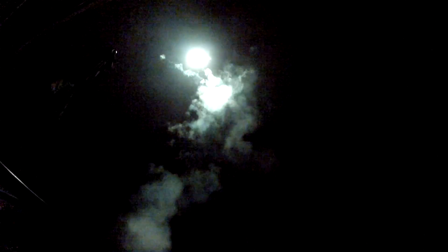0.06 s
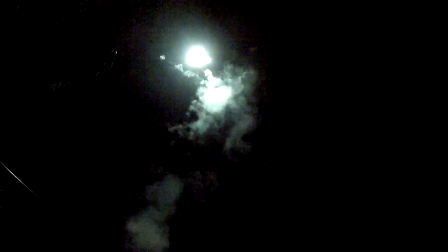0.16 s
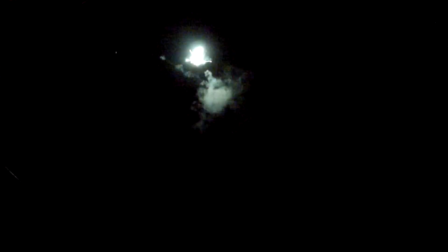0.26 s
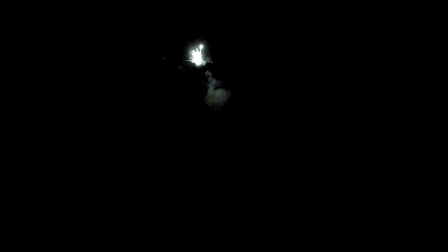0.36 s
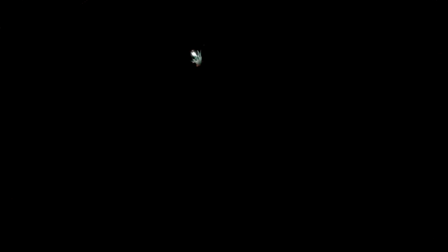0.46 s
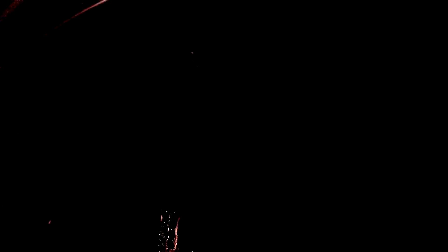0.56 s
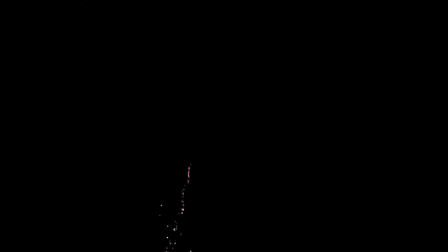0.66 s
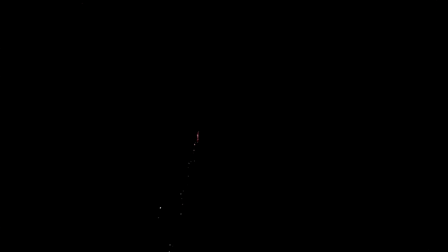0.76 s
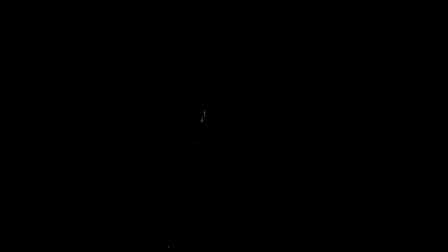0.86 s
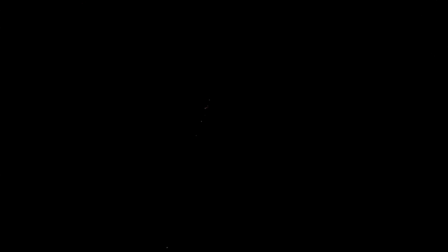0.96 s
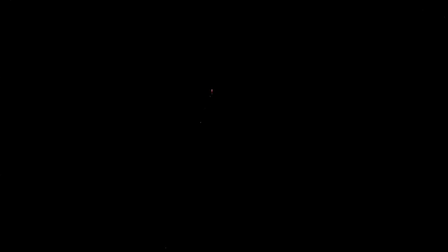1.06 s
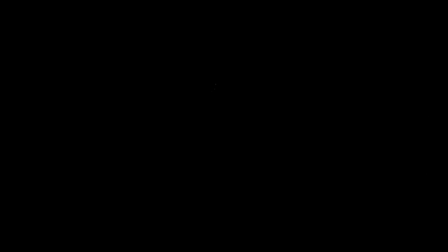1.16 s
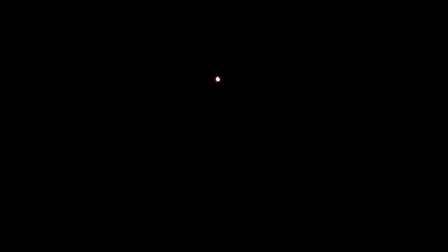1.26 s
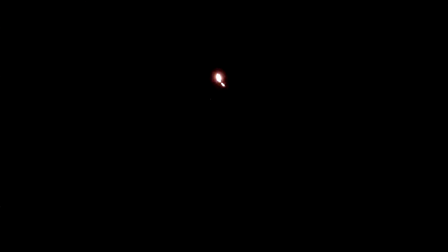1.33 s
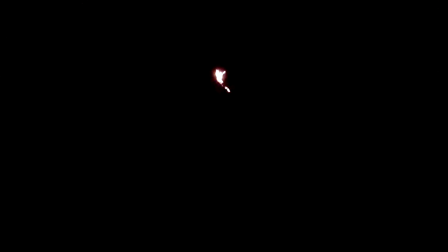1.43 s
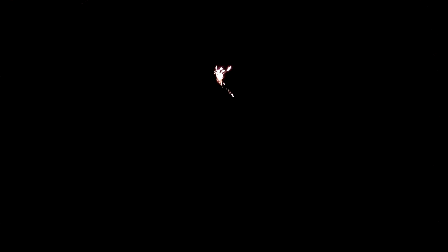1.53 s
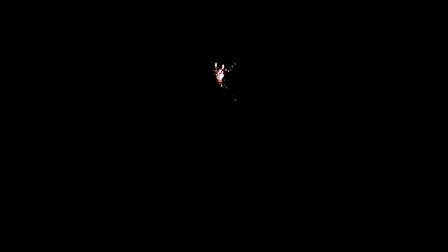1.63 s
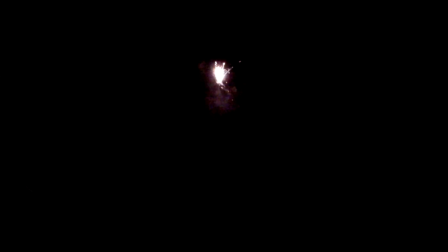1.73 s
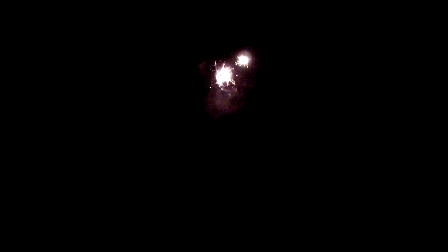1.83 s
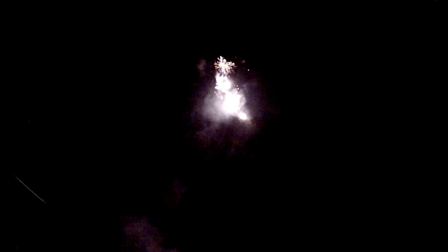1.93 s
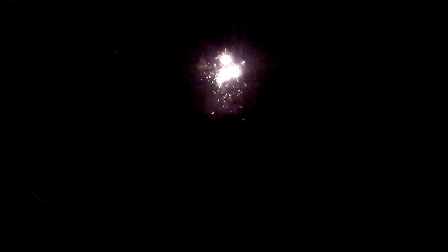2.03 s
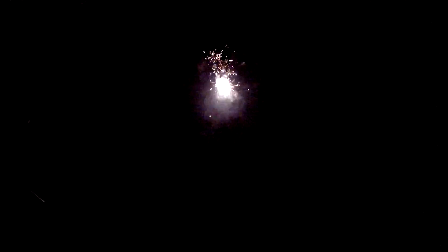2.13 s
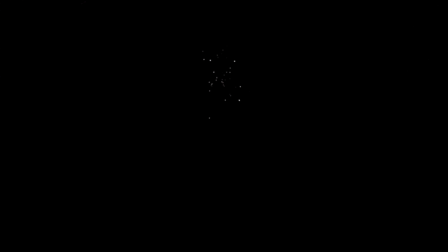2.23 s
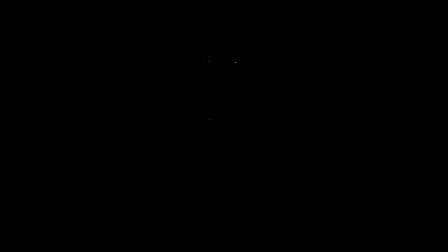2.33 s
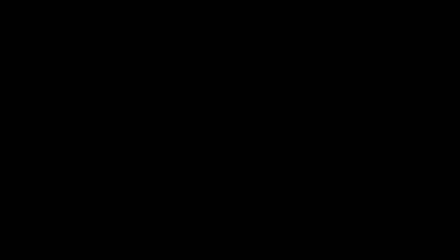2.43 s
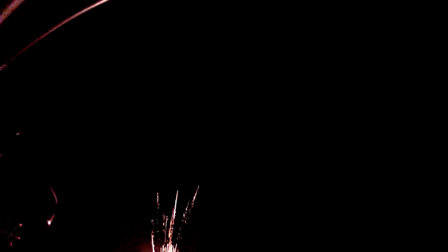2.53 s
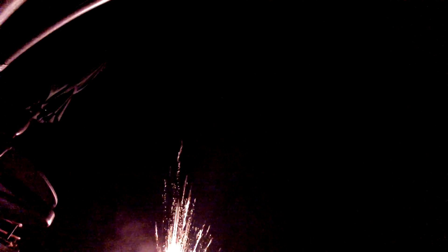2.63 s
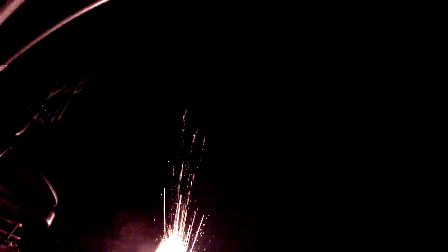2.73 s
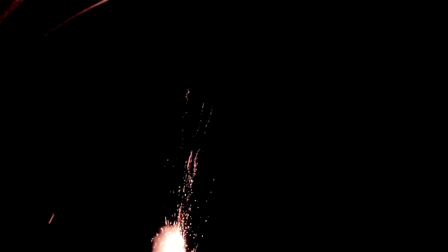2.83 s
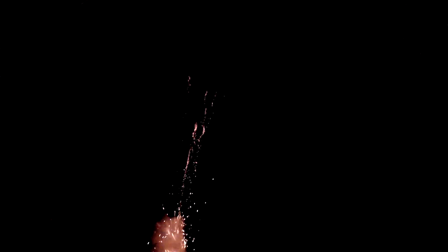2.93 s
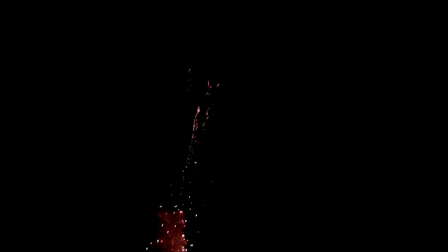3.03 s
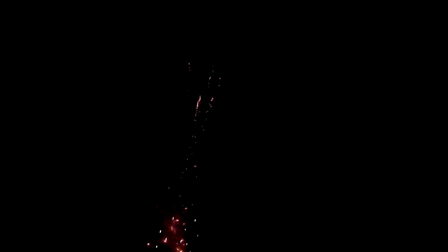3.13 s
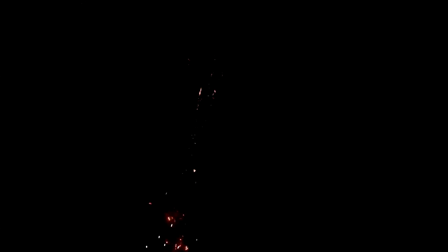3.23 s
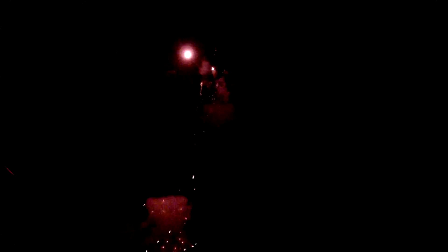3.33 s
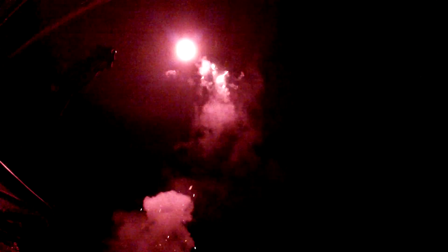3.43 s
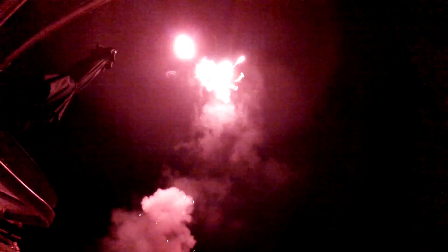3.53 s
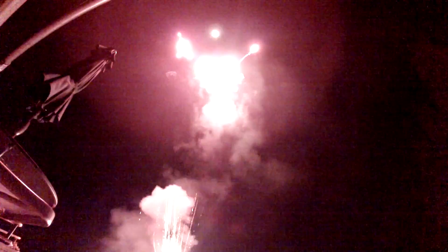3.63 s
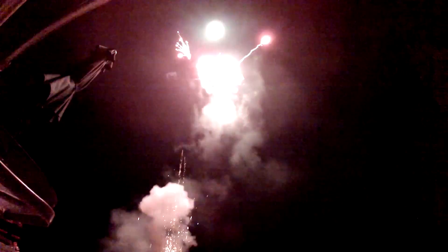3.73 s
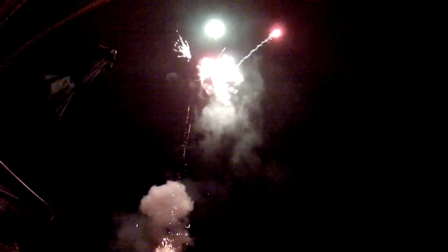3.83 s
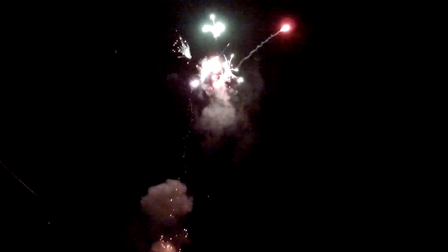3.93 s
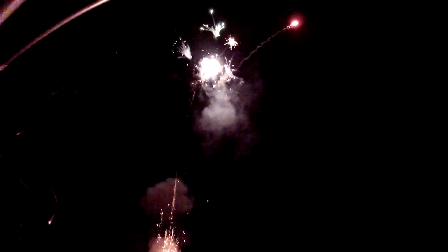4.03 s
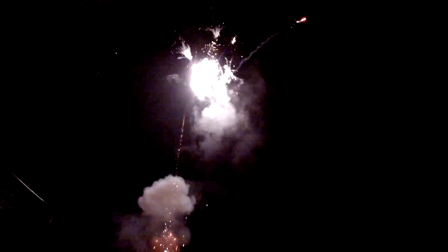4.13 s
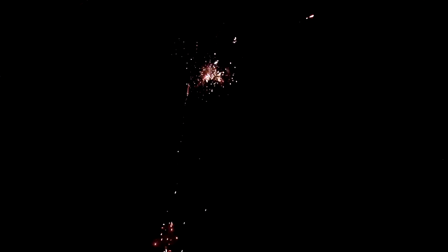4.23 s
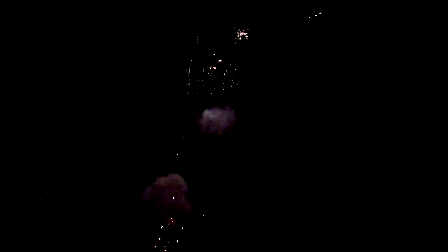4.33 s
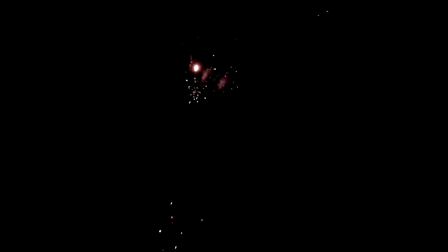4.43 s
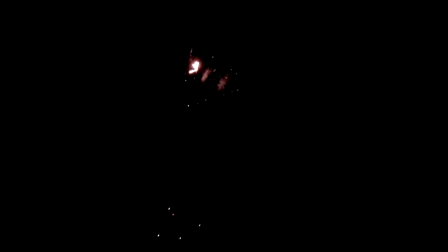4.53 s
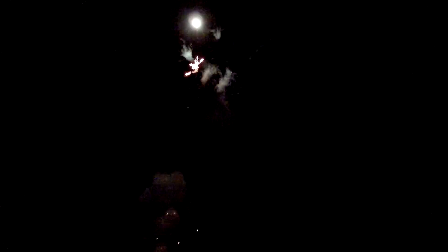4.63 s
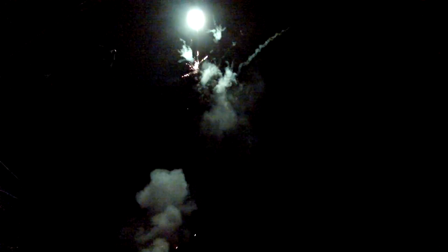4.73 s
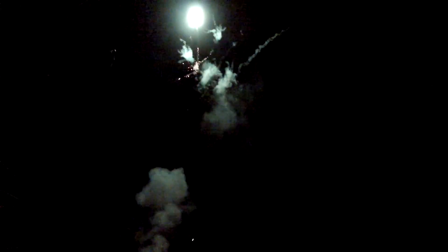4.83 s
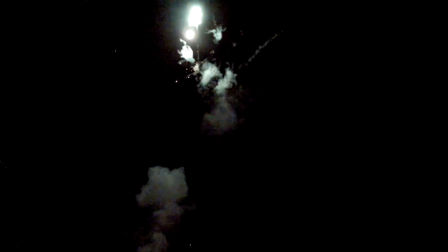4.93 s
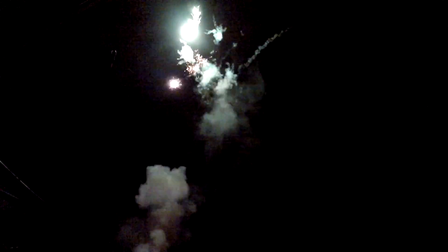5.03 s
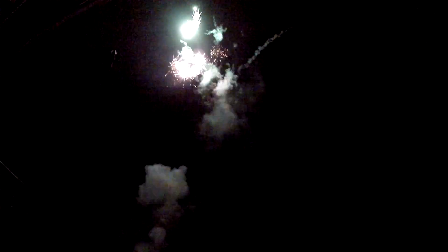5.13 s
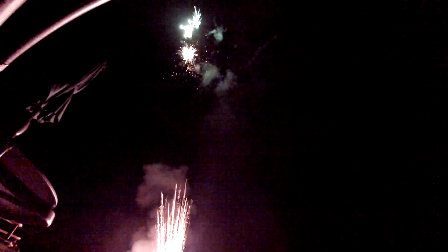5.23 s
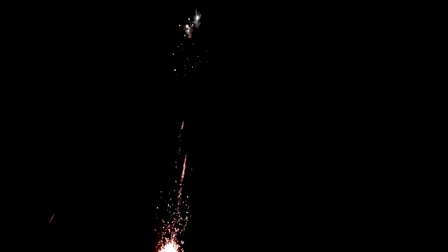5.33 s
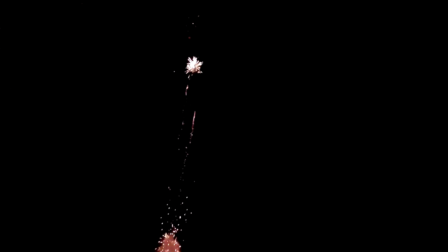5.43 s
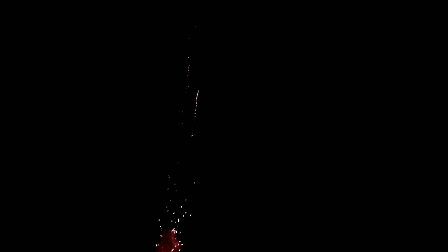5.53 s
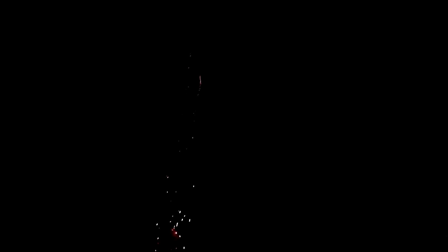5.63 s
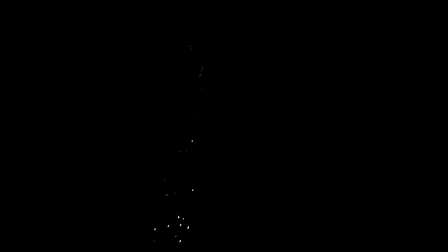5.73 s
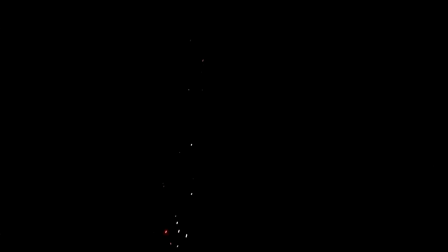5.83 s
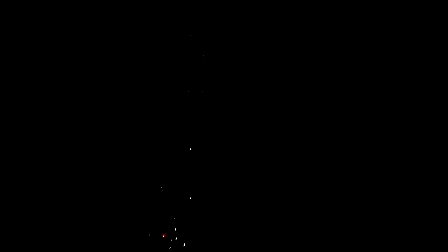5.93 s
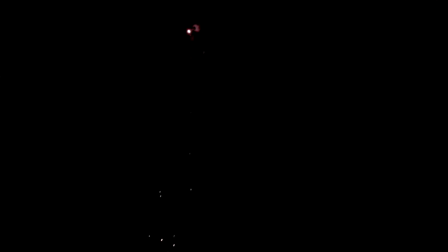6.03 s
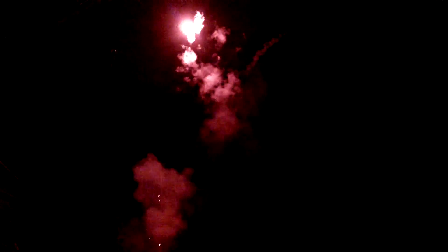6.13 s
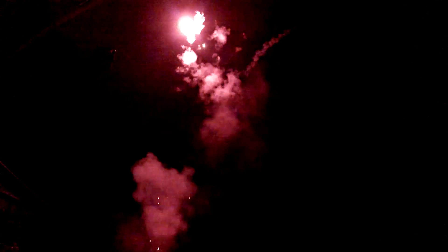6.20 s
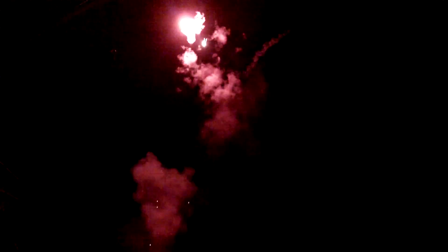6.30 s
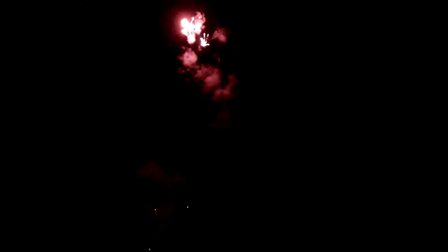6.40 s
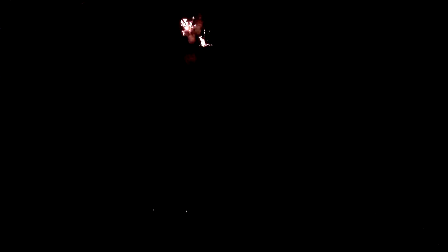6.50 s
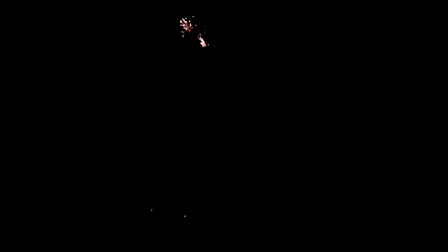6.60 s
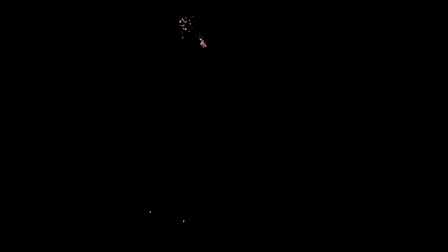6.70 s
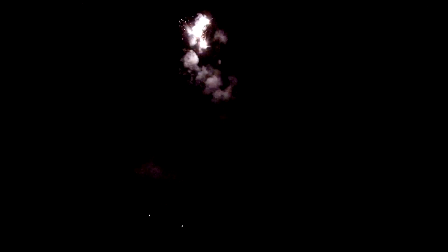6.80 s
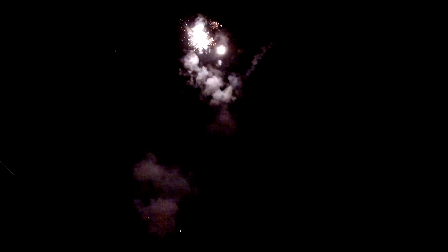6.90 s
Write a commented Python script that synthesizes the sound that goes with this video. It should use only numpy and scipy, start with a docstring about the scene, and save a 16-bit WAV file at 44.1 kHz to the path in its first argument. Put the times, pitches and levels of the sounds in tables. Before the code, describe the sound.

At night outdoors, heavy distorted launch thuds alternate with rapid, loud crackles from above, echoing off trees and walls over low rumble.

```python
"""Open ground at night, close to a firework cake that is firing.
Lift charges thump, each a weak noisy arrival and then a strong blast, and overload the microphone. Overhead, crackling
stars burst in volleys of sharp pulses, each followed by its reflection off the ground. Tails and flares hiss as noise.
Trees and walls answer with a long echo. A low rumble, dull thuds, soft pops and faint hollow sounds fill in."""
import sys
import numpy as np
from scipy import signal
from scipy.fft import rfft, irfft, next_fast_len
from scipy.io import wavfile

SR = 44100
rng = np.random.default_rng(int(sys.argv[2]) if len(sys.argv) > 2 else 0)


def int16_out(signal):
    """Quantize to a 16-bit WAV file."""
    q = np.round(np.clip(np.atleast_2d(signal).T, -1, 1) * 32767)
    wavfile.write(sys.argv[1], SR, q.astype(np.int16))


N = 306936   # length of the scene [samples]

# The cracks that stand out, stars bursting overhead: (time [s], peak of the direct shock [dB])
SINGLE_CRACKS = [(0.6673, -37.5), (1.353, -37.5), (1.8326, -6.5), (1.844, -3), (1.8873, -2), (1.9196, -4),
                 (1.9222, -3), (1.9391, -5.5), (2.0065, 0), (2.0308, -3), (2.0434, 2), (2.0533, 0.5),
                 (2.0788, -2), (2.1152, 1), (2.1179, -0.5), (2.1248, -2.5), (2.162, -1), (2.1843, -3.5),
                 (2.1874, 0.5), (2.2116, -.5), (2.2318, 1), (3.4995, -35), (3.558, -28), (3.599, -28.5),
                 (3.8029, -33), (3.9732, -8), (4.011, -7), (4.0335, -2), (4.0634, -7), (4.094, -9.5),
                 (4.1222, -9.5), (4.1477, -4), (4.1618, 0.5), (4.2033, -1), (4.2084, 0.5), (4.2148, 0.5),
                 (4.2475, 0), (4.2631, -0.5), (4.2751, -1), (4.3059, -5.5), (4.3165, -3.5), (4.4183, -5.5),
                 (4.4676, -4.5), (4.8915, -6), (4.977, -26), (5.1046, -3), (5.1089, -2.5), (5.1179, -2),
                 (5.1396, -5.5), (5.1695, -0.5), (5.1993, -0.5), (5.2138, -3.5), (5.2232, 1),
                 (5.2401, -1.5), (5.3194, -5), (5.378, 2), (5.512, 0), (6.1511, -35.5), (6.3496, -26),
                 (6.51, -29), (6.8927, -8), (6.9146, -8), (6.928, -5.5)]
# Weaker stars in the thick of a volley, too fast to tell apart:
# (start [s], length [s], rate [stars per s], typical peak [dB])
STAR_VOLLEYS = [(4.068, .115, 61, -9), (4.209, .055, 145, -5), (5.215, .02, 150, -3.5),
                (5.266, .036, 83, -6), (6.917, .045, 67, -8)]
# Lift charges: (time [s], blast peak [dB], extra bass [dB], extra treble [dB])
LIFT_CHARGES = [(0.5699, -5.5, -9.5, -5.5), (0.5743, 0.5, -10, 2), (2.564, 6, -0.5, 2),
                (2.6241, 5.5, -1.5, 0.5), (2.646, 4.5, 6.5, -6.5), (2.686, -9, -16.5, 4),
                (2.692, 0, -3, -1), (2.7411, 3, 0.5, -5), (2.8037, 7.5, 0.5, 5.5), (2.8363, 3, -3, -1.5),
                (3.643, -13, -20, 8), (3.6469, 2, -6.5, -1), (3.705, 7, 3.5, 2), (4.0426, 6.5, -1.5, 5.5),
                (5.258, 8.5, 4.5, -2), (5.2921, 2, 3, -3)]
# Dull knocks and thuds from further off: (time [s], level before a 6.5 dB cut [dB], pitch [Hz])
DULL_THUDS = [(0.699, -32, 91.5), (0.777, -38, 108), (1.279, -43, 99.6), (1.331, -31.5, 332),
              (3.019, -36, 91.8), (3.919, -28, 142.3), (4.679, -37.5, 48.2), (5.06, -30, 392),
              (5.43, -24.5, 113.6), (5.649, -38, 78.1), (6.423, -34.5, 344)]
# Faint soft pops: (time [s], level before a 9.5 dB cut [dB], extra treble [dB])
SOFT_POPS = [(.268, -46.5, 0.5), (1.557, -50, -2), (3.404, -25, -30), (3.584, -39.5, 8.5),
             (6.845, -28.5, -12), (6.857, -33, -18)]
# Faint short hollow sounds: light taps and rubs, and a few faint far echoes:
# (time [s], strength of the driving noise [dB], length [s])
HOLLOW_SOUNDS = [(0.065, -49, 0.037), (0.123, -49, 0.22), (0.265, -40.5, 0.019), (0.774, -51, 0.02),
                 (0.866, -50, 0.016), (1.051, -48.5, 0.019), (1.324, -50, 0.022), (1.4, -45.5, 0.021),
                 (1.49, -42, 0.0077), (1.551, -47, 0.053), (3.382, -44, 0.023), (3.525, -35.5, 0.045),
                 (6.435, -46.5, 0.04), (6.62, -46.5, 0.018)]
# What the hollow sounds ring with: (frequency [Hz], width [Hz], strength [dB])
HOLLOW_RINGS = [(494, 140, -6), (640, 52, 1), (820, 57, 6), (920, 38, -8), (1674, 34, -3.5),
                (2210, 83, -29), (2870, 140, -32), (3700, 100, -28)]
# Stars flaring overhead: (time [s], loudest hiss [dB], length [s])
STAR_FLARES = [(0, -77, 0.69), (1.3, -76, 0.62), (3.48, -62, 0.64), (6.22, -68, 0.46)]

# Spectra, of which only the shape counts: (frequency [Hz], level [dB])
# a star's direct shock
SHOCK_SPECTRUM = [(20, -40), (200, 0.5), (400, -5), (750, 3.5), (1300, 0), (1800, -0.5), (2500, -0.5),
                  (4000, -3.5), (6000, -5), (8000, -14), (10500, -15.5), (15000, -31)]
# its reflection off the ground: (frequency [Hz], level [dB])
GROUND_SPECTRUM = [(20, -31), (200, -9.5), (500, -3.5), (1200, 2.5), (1700, -3.5), (2300, -6), (3300, -1),
                   (5000, -12.5), (8000, -14.5), (12000, -19.5), (15000, -36.5)]
# its reflections off nearby things: (frequency [Hz], level [dB])
CRACK_SCATTER_SPECTRUM = [(20, -32.5), (100, -16), (200, 0.5), (400, -3.5), (1100, 2), (1800, 0.5),
                          (3000, -2), (5500, -9.5), (7500, -16), (10000, -15.5), (15000, -39.5)]
# the blast of a lift charge: (frequency [Hz], level [dB])
BLAST_SPECTRUM = [(20, -13), (85, -2.5), (145, -3), (200, -12), (350, -1.5), (600, 1.5), (780, -7.5),
                  (1050, 3.5), (1400, -4.5), (1700, -12.5), (2500, -9), (4500, -22.5), (7000, -30.5),
                  (15000, -48.5)]
# the weak noisy arrival before a blast, also used for the pops: (frequency [Hz], level [dB])
FIRST_ARRIVAL_SPECTRUM = [(30, -2), (130, -7), (220, -7), (350, 3.5), (1100, 0), (1600, -5.5), (2500, 3),
                          (5000, -12), (10000, -23), (15000, -37.5)]
# a blast's reflections off nearby things: (frequency [Hz], level [dB])
LIFT_SCATTER_SPECTRUM = [(25, -13), (85, 3), (155, 3), (230, 0), (350, 5), (650, 3), (1200, -6), (1800, -8),
                         (2800, -12), (5000, -23.5), (10000, -33.5), (15000, -46.5)]
# the long echo: (frequency [Hz], level [dB])
ECHO_SPECTRUM = [(30, -5), (120, -7.5), (400, 3), (800, 0), (1500, 2.5), (3000, -1), (6000, -5.5),
                 (10000, -1), (15000, -8)]
# hiss of tails and flares: (frequency [Hz], level [dB])
FIZZ_SPECTRUM = [(300, -13), (1000, 1), (3000, 0.5), (5800, -6.5), (7200, -11), (11000, -15),
                 (15000, -33.5)]
# low rumble of the night air: (frequency [Hz], level [dB])
NIGHT_SPECTRUM = [(20, -16), (45, -12), (95, -4.5), (135, -9), (180, -7.5), (270, -13), (450, -17.5),
                  (900, -21.5), (1500, -30.5), (4000, -45), (11000, -52.5), (16000, -71)]
# How long the surroundings take to ring down by 60 dB: (frequency [Hz], ring time [s])
ECHO_RING_TIME = [(60, 2.9), (500, 1.5), (1200, 1.53), (3000, 1.36), (6000, 1.2), (11000, 0.36),
                  (16000, 0.51)]

NIGHT_DB = -57
NEAR_CRACK_DB = -12   # fainter cracks than this lose treble
CUTOFF_HZ = 15700
# lag of the ground reflection; it varies a little with a star's place in the sky
GROUND_DELAY_MS, GROUND_SPREAD_MS = 1.573, 0.04
VOLLEY_SPREAD_DB = 0.5   # from star to star
FIRST_ARRIVAL_DB = -22.5   # relative to the blast's peak, before its swell
# each shot's burning tail swells and fades as it climbs; its level is relative to the lift's peak
TAIL_DB, TAIL_RISE_S, TAIL_FADE_DB_PER_S = -71.5, 0.1, 25.5
FLARE_RISE_S = 0.082
HOLLOW_GRAIN_DB = 5   # unevenness of the tiny grains in a hollow sound
SPUTTER_DB = 1.5   # unevenness of the sparks in the hiss


def from_db(db):
    """Turn decibels into a plain multiplier."""
    return 10 ** (np.asarray(db) / 20)


def at_hz(points, hz):
    """Read a table on a log-frequency axis."""
    table_hz, value = np.transpose(points)
    return np.interp(np.log(np.maximum(hz, 1)), np.log(table_hz), value)


def unit_energy(x):
    """Scale a signal so that its squares add up to 1."""
    return x / np.sqrt(np.sum(x ** 2) + 1e-20)


def add(track, s, sound):
    """Mix a sound into a track at a time in seconds."""
    i = max(round(s * SR), 0)
    part = sound[:max(N - i, 0)]
    track[i:i + len(part)] += part


def colour(spectrum, hz, bass_db, treble_db):
    """Gain of a spectrum with extra bass and treble, like two tone knobs."""
    bass = bass_db / (1 + (hz / 300) ** 4)
    treble = treble_db * hz ** 2 / (hz ** 2 + 2500 ** 2)
    return from_db(at_hz(spectrum, hz) + bass + treble)


def noise(spectrum, size, bass_db=0, treble_db=0):
    """Random noise with a given spectrum, rms 1."""
    n = next_fast_len(size)
    gain = colour(spectrum, np.fft.rfftfreq(n, 1 / SR), bass_db, treble_db)
    x = irfft(rfft(rng.standard_normal(n)) * gain, n)[:size]
    return x / np.std(x)


def uneven(size, grain_db, top=5):
    """Random grain strengths, mostly small with a few large ones; rms 1."""
    strength = from_db(grain_db * np.minimum(rng.exponential(1, size), top))
    return strength / np.sqrt(np.mean(strength ** 2))


def pulse(spectrum, bass_db=0, treble_db=0, size=2048):
    """The most abrupt pressure pulse with this spectrum and nothing before its start; peak 1, falling first."""
    gain = colour(spectrum, np.fft.rfftfreq(size, 1 / SR), bass_db, treble_db)
    # folding the cepstrum forward in time packs the energy at the start (minimum phase)
    cepstrum = irfft(np.log(gain))
    cepstrum[1:size // 2] *= 2
    cepstrum[size // 2 + 1:] = 0
    p = irfft(np.exp(rfft(cepstrum)))
    return -p / np.max(np.abs(p))


def smear(p, hz, width_hz):
    """An all-pass filter delays the middle of a pulse, which makes it swing back strongly; peak 1."""
    r = np.exp(-np.pi * width_hz / SR)
    a = [1, -2 * r * np.cos(2 * np.pi * hz / SR), r * r]
    p = signal.lfilter(a[::-1], a, p)
    return p / np.max(np.abs(p))


def scatter(spectrum, near_db, near_s, far_db, far_s, bass_db=0, size=8192):
    """Reflections off nearby things: a quick dense cluster and a slower one; dB is the energy of each."""
    t = np.arange(size) / SR
    near = from_db(near_db) * unit_energy(np.exp(-t / near_s))
    far = from_db(far_db) * unit_energy(np.exp(-t / far_s))
    return noise(spectrum, size, bass_db) * np.hypot(near, far)


def night(waver_db=3.0):
    """Low rumble of the outdoors, wavering a few times a second."""
    knots = np.arange(0, N, SR // 8)
    waver = np.interp(np.arange(N), knots, rng.standard_normal(len(knots)))
    return from_db(NIGHT_DB + waver_db * waver) * noise(NIGHT_SPECTRUM, N)


def surroundings(x, build_s, patchy_db, grain_db, bass_db=0, treble_db=0):
    """Countless uneven echoes from trees and walls build up, then die away at a pace set by their pitch."""
    size = 2 * SR
    t, hz = np.arange(size) / SR, np.fft.rfftfreq(size, 1 / SR)
    echoes = unit_energy(rng.standard_normal(size) * uneven(size, grain_db, top=5.4))
    coloured = rfft(echoes) * colour(ECHO_SPECTRUM, hz, bass_db, treble_db)
    # split into overlapping bands, each with its own ring time
    centres, tail = np.geomspace(60, 16000, 10), 0
    for centre, share in zip(centres, np.eye(len(centres))):
        band = irfft(coloured * at_hz(np.c_[centres, share], hz), size)
        tail = tail + band * from_db(-60 * t / at_hz(ECHO_RING_TIME, centre))
    patches = np.interp(t, np.linspace(0, 2, 300), rng.standard_normal(300))
    tail = tail * (1 - np.exp(-t / build_s)) * from_db(patchy_db * patches)
    return signal.fftconvolve(x, tail)[:N]


def thuds(rise_cycles=0.51):
    """Dull thuds from further off: a low tone swells quickly and rings for a few cycles."""
    out, t = np.zeros(N), np.arange(SR // 4) / SR
    for s, db, hz in DULL_THUDS:
        age = t * hz / rise_cycles
        envelope = age * np.exp(1 - age)
        add(out, s - 0.002, from_db(db - 6.5) * envelope * np.sin(2 * np.pi * hz * t))
    return out


def pops():
    """Soft pops: short puffs of noise that die away in milliseconds."""
    out, t = np.zeros(N), np.arange(SR // 4) / SR
    for s, db, treble_db in SOFT_POPS:
        puff = np.exp(-t / 0.0067) * noise(FIRST_ARRIVAL_SPECTRUM, len(t), treble_db=treble_db)
        add(out, s, from_db(db - 9.5) * puff)
    return out


def hollow_sounds(soft_hz=3600):
    """Short bursts of soft, grainy noise set a group of hollow resonances ringing."""
    bursts = np.zeros(N)
    for s, db, length in HOLLOW_SOUNDS:
        u = np.linspace(0, 1, int(length * SR))
        grains = rng.standard_normal(len(u)) * uneven(len(u), HOLLOW_GRAIN_DB)
        envelope = np.minimum(7 * u, 1) * np.sqrt(1 - u)
        add(bursts, s, from_db(db) * envelope * grains)
    bursts = signal.sosfilt(signal.butter(3, soft_hz, fs=SR, output="sos"), bursts)
    body = np.zeros(N)
    for hz, width, db in HOLLOW_RINGS:
        b, a = signal.iirpeak(hz, hz / width, fs=SR)
        body += from_db(db) * signal.lfilter(b, a, bursts)
    return from_db(11) * body


def burning_hiss():
    """Tails fizz on the way up from every lift; flaring stars hiss until they burn out."""
    t, power = np.arange(N) / SR, np.zeros(N)
    for s, db, _, _ in LIFT_CHARGES:
        age = np.maximum(t - s, 0)
        rise = np.minimum(age / TAIL_RISE_S, 1)
        power += (rise * from_db(db + TAIL_DB - TAIL_FADE_DB_PER_S * age)) ** 2
    for s, db, length in STAR_FLARES:
        swell = np.interp(t - s, [0, FLARE_RISE_S, length], [0, 1, 0])
        power += (from_db(db) * swell) ** 2
    sparks = np.arange(0, N, SR // 1000)   # about a thousand a second
    sputter = np.interp(np.arange(N), sparks, uneven(len(sparks), SPUTTER_DB))
    return np.sqrt(power) * sputter * noise(FIZZ_SPECTRUM, N)


def lifts(first_s=0.0036, rise_s=0.0031):
    """A weak, noisy first arrival swells for a few milliseconds, then the strong blast arrives."""
    out, t = np.zeros(N), np.arange(int(first_s * SR)) / SR
    swell = 2 * np.exp((t - first_s) / rise_s)
    for s, db, bass_db, treble_db in LIFT_CHARGES:
        first_arrival = swell * noise(FIRST_ARRIVAL_SPECTRUM, len(t), bass_db, treble_db)
        blast = -smear(pulse(BLAST_SPECTRUM, bass_db, treble_db), hz=1500, width_hz=4000)
        scattered = scatter(LIFT_SCATTER_SPECTRUM, near_db=-0.5, near_s=0.0019,
                            far_db=-3.5, far_s=0.022, bass_db=bass_db)
        add(out, s - first_s, from_db(db + FIRST_ARRIVAL_DB) * first_arrival)
        add(out, s - 0.0003, from_db(db) * blast)
        add(out, s + 0.002, from_db(db) * scattered)
    return out


def volley_stars():
    """Stars of a volley go off one after another, each early or late by chance: (time [s], peak [dB])."""
    stars = []
    for start, length, per_s, db in STAR_VOLLEYS:
        count = max(round(length * per_s), 1)
        times = start + length * (np.arange(count) + rng.random(count)) / count
        stars += zip(times, rng.normal(db, VOLLEY_SPREAD_DB, count))
    return stars


def cracks(ground_db=-1.0, spread_db=1.0, lead_ms=0.088, jitter_ms=0.037, dulling=0.69):
    """Each star sends one shock; the ground returns a coloured copy, and nearby things scatter it."""
    direct, reflected = np.zeros((2, N))
    for s, db in SINGLE_CRACKS + volley_stars():
        start = s - (lead_ms + rng.uniform(-jitter_ms, jitter_ms)) / 1000
        bounce = start + rng.normal(GROUND_DELAY_MS, GROUND_SPREAD_MS) / 1000
        # faint cracks are further off, and the air takes more of their treble
        air_db = dulling * min(db - NEAR_CRACK_DB, 0)
        shock_treble_db, bounce_treble_db = rng.normal(0, spread_db, 2) + air_db
        scattered = scatter(CRACK_SCATTER_SPECTRUM, near_db=-3.5, near_s=0.0028, far_db=-4.5, far_s=0.011)
        add(direct, start, from_db(db) * pulse(SHOCK_SPECTRUM, treble_db=shock_treble_db))
        add(reflected, bounce, from_db(db + ground_db) * pulse(GROUND_SPECTRUM, treble_db=bounce_treble_db))
        add(reflected, bounce, from_db(db) * scattered)
    return direct, reflected


def scene():
    """Bursts high up reach more of the surroundings than blasts at ground level, which roll back in lumps."""
    shocks, reflected = cracks()
    blasts = lifts()
    sky_send = from_db(-2.0) * shocks + from_db(-18.5) * reflected
    sky_echo = surroundings(sky_send, build_s=0.065, patchy_db=4.0, grain_db=4.0)
    ground_echo = surroundings(from_db(-20.5) * blasts, build_s=0.097, patchy_db=5.5, grain_db=4.5,
                               bass_db=-1.0, treble_db=2.0)
    background = night() + thuds() + pops() + hollow_sounds()
    fireworks = burning_hiss() + blasts + shocks + reflected
    return (background + sky_echo + ground_echo + fireworks)[None]


def record(dry):
    """The microphone clips whatever passes full scale; then the very top of the treble is cut."""
    clipped = np.clip(dry, -1, 1)
    return signal.sosfilt(signal.ellip(10, 0.1, 70, CUTOFF_HZ, fs=SR, output="sos"), clipped)


dry = scene()
out = record(dry)
int16_out(out)
```